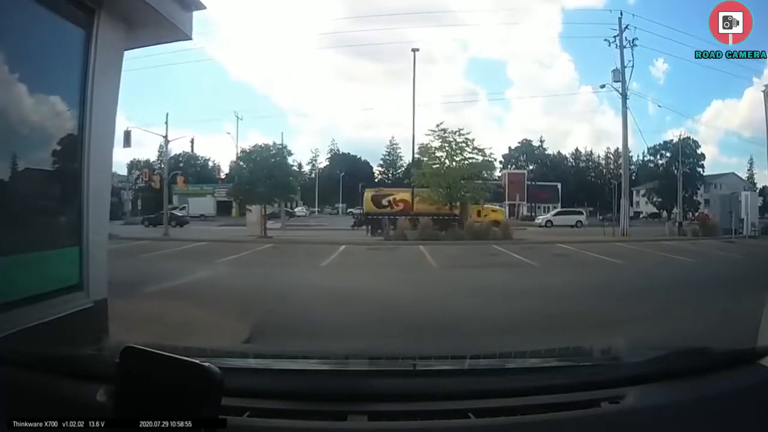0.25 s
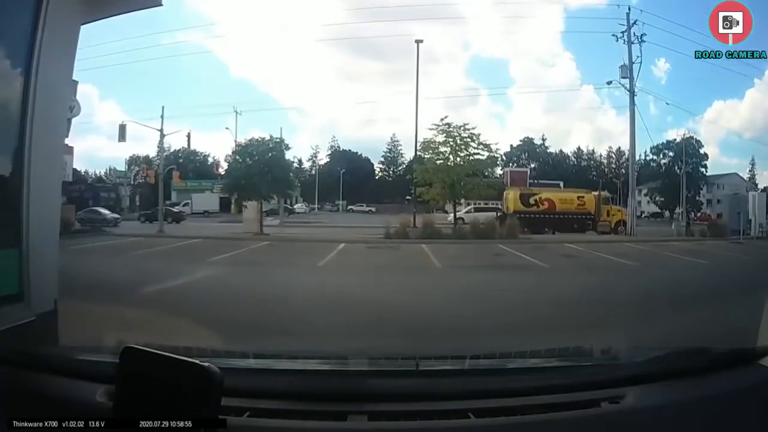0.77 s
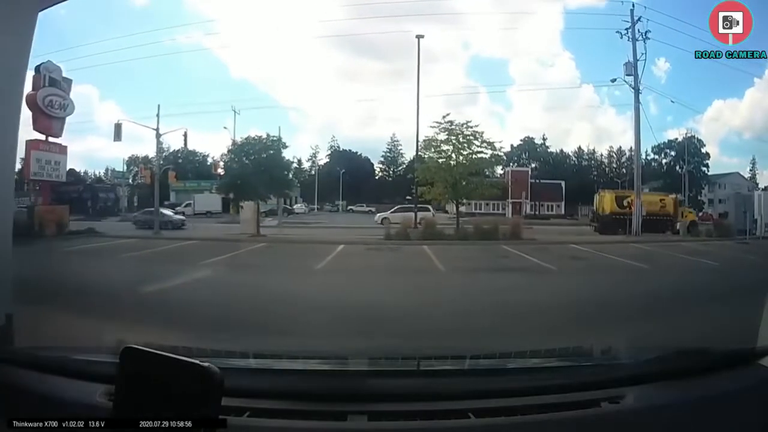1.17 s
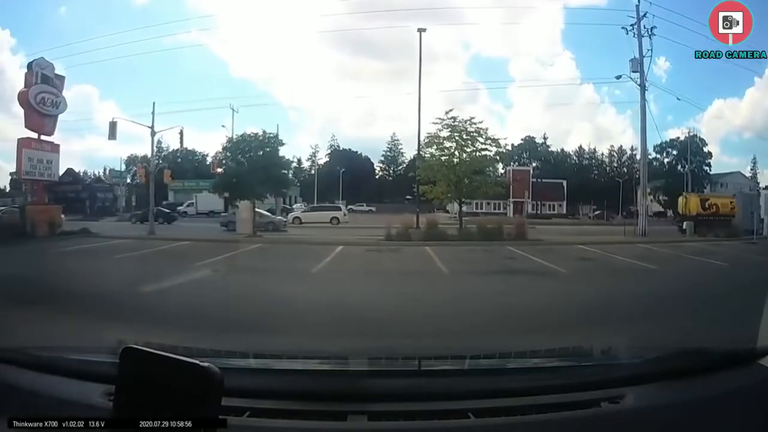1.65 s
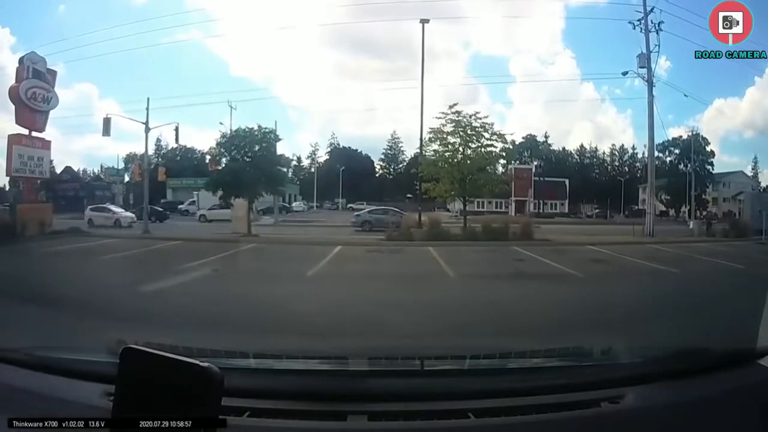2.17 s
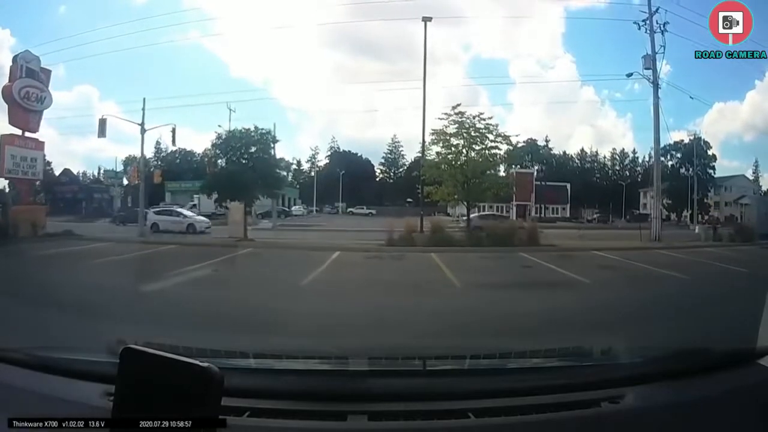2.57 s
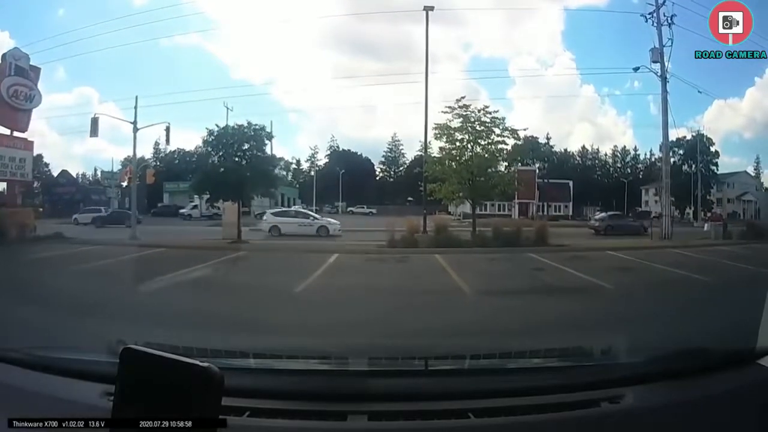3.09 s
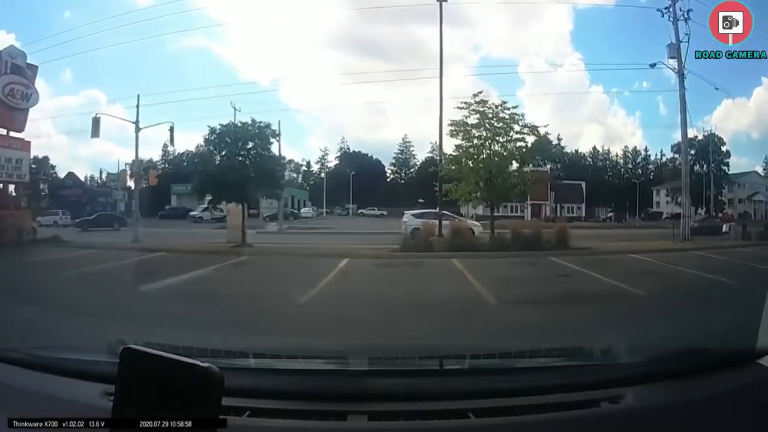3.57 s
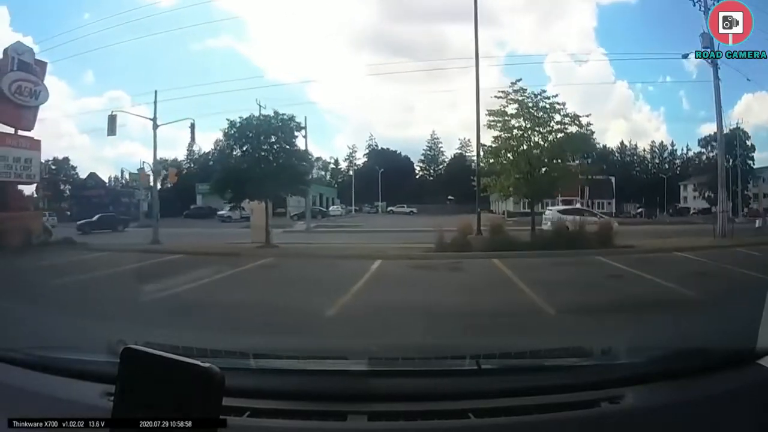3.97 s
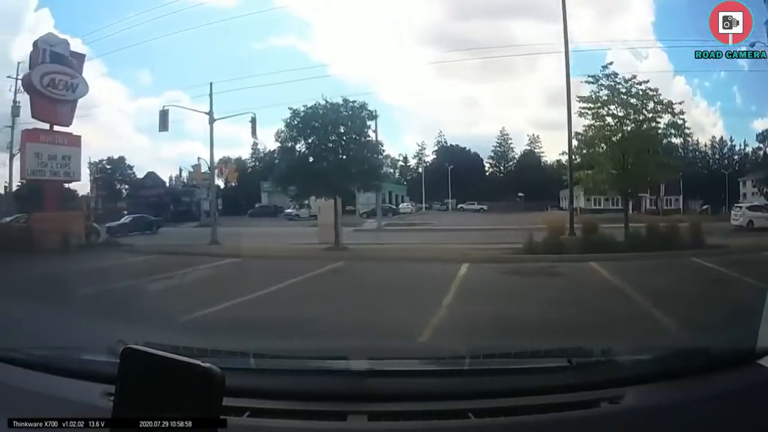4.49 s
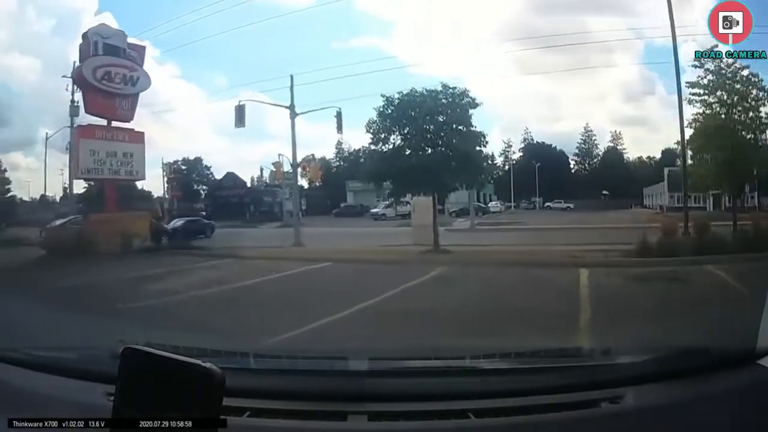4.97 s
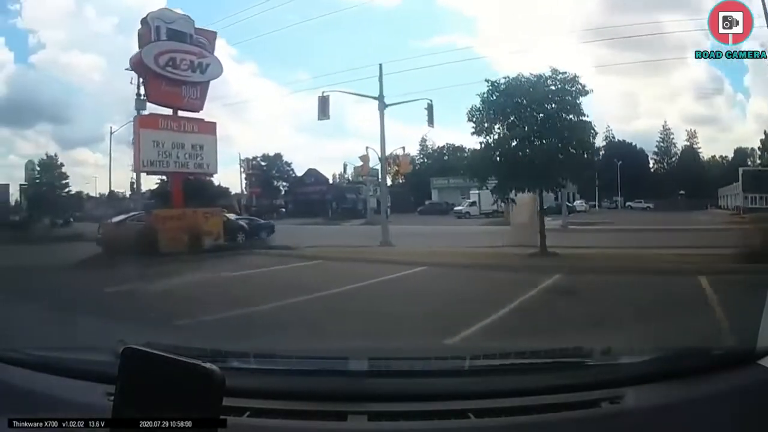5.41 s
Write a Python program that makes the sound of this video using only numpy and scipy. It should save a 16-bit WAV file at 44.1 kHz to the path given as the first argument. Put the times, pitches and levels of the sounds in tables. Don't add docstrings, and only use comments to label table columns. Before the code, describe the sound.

The microphone is inside a slowly moving car in a car park. A low, slightly stumbling engine hum and rumble run throughout, with very faint fan air and soft traffic wash outside. From about 0.3 to 1 s a truck's engine drones in pulls, sinking in pitch and fading away by 2 s. Dry plastic ticks come in a cluster at 0.4-0.7 s, then singly around 1.4-2.8 s and near 3.7 s. From 2.9 s a very faint high steering whine wavers; a car washes past near 3.8 s and the engine note rises. Around 4.05 s tyres begin to chirp outside, swelling into a rough, loud squeal with hiss, strongest at 4.7-5 s, then easing and dropping in pitch. At 5.42 s comes a heavy crash: thumps, snapping plastic, crunching metal, clanging bits and a deep cabin boom. A brief tyre scrape at 5.5-5.65 s and echo end it.

```python
import sys
import numpy as np
from scipy import signal
from scipy.fft import rfft, irfft, next_fast_len
from scipy.io import wavfile
from scipy.ndimage import uniform_filter1d, map_coordinates

SR = 44100
rng = np.random.default_rng(int(sys.argv[2]) if len(sys.argv) > 2 else 0)


def volts_from_db(level):
    exponent = np.asarray(level, float) / 20
    return 10 ** exponent


def bounce(signal):
    frames = np.transpose(np.atleast_2d(signal))
    limited = np.clip(frames, -1, 1)
    pcm = np.round(limited * 32767).astype(np.int16)
    wavfile.write(sys.argv[1], SR, pcm)


N = 248811

# t/s, slip f/Hz, level/dB, overtone level/dB
FRONT_TYRE = [(4.05, 1131, -49.5, -15), (4.26, 1125, -55, -17), (4.36, 1107, -39.5, -24.5),
              (4.5, 1062, -37, -16), (4.58, 1005, -47, -6), (4.68, 950, -36, -4), (4.8, 960, -32, 0),
              (4.93, 935, -35, 3), (5.04, 911, -32, 7.5), (5.12, 878, -30, 0), (5.19, 852, -36, 3.5),
              (5.27, 808, -35.5, 3), (5.3, 780, -48, -20)]
# t/s, slip f/Hz, level/dB
REAR_TYRE = [
    (4.17, 1233, -54),
    (4.32, 1169, -46),
    (4.6, 1119, -43),
    (4.82, 1004, -33.5),
    (4.961, 996, -29),
    (5.08, 955.5, -36.5),
    (5.2, 924, -37.5),
    (5.42, 853.5, -40.5),
]
# t/s, slip f/Hz, level/dB
INNER_TYRE = [
    (4.55, 886, -66.5),
    (4.63, 794, -45),
    (4.9, 766, -45),
    (5.04, 770, -49.5),
    (5.12, 652.4, -54.5),
    (5.29, 570, -53.5),
    (5.33, 541.5, -44.5),
    (5.37, 525, -54),
]
# t/s, slip f/Hz, level/dB
REBOUND_TYRE = [
    (5.49, 1058, -37),
    (5.54, 1026, -40),
    (5.565, 961, -42),
    (5.6, 948, -38),
    (5.68, 920, -45),
]
# t/s, f/Hz, level/dB, length/s
GRABS = [(4.055, 1140, -46.5, 0.048), (4.1, 1125, -48, 0.032), (4.14, 1120, -49, 0.024),
         (4.21, 1058, -41.5, 0.015), (4.225, 1209, -46, 0.039), (4.26, 1015, -44.5, 0.033),
         (4.285, 1143, -38, .026), (4.465, 1074, -40.5, 0.037), (4.53, 1005, -42, .03),
         (4.592, 985, -29.5, .018), (4.613, 977.4, -30, .03), (4.655, 960, -31.5, 0.034),
         (4.675, 1004, -33, .03), (4.55, 1150, -43, .04), (4.68, 1150, -38, .04), (4.69, 930, -31.5, 0.032),
         (4.74, 962, -26, 0.023), (4.76, 986, -23.5, 0.023), (4.765, 760, -33.5, 0.037),
         (4.795, 1000, -27, 0.021), (4.82, 953.6, -24, .028), (4.848, 1020, -23, 0.029),
         (4.865, 970, -28, .02), (4.885, 955, -28, 0.022), (4.91, 937, -26, .03), (4.935, 1009, -23, 0.019),
         (4.955, 1004, -25.5, 0.015), (4.985, 902, -27.5, 0.03), (5.005, 930, -29.5, 0.019),
         (5.04, 925, -35, 0.016), (5.075, 891, -30.5, 0.047), (5.14, 869.6, -33, 0.032),
         (5.295, 782, -38, 0.031), (5.556, 975, -28.5, .02), (5.574, 958, -31, .016),
         (5.59, 945, -34, 0.016), (5.604, 934, -36, .012)]
# t/s, level/dB
SLIDE_HISS = [
    (4.25, -83.5),
    (4.52, -68),
    (4.62, -57),
    (4.7, -45.5),
    (4.83, -41.5),
    (5.08, -49),
    (5.25, -60.5),
    (5.41, -66),
              (5.501, -47),
    (5.545, -65.5),
    (5.57, -50),
    (5.68, -66),
]
# f/Hz, level/dB per Hz
HISS_COLOUR = [(400, -22.5), (670, -14), (750, 8.5), (1150, 9), (1380, -2.5), (1750, -5.5), (2250, 5),
               (2570, -11.5), (2850, -5.5), (4300, -15), (5600, -26), (7900, -30.5), (10000, -44),
               (12500, -61.5)]
# f/Hz, level/dB
GLASS = [(300, -22.5), (550, 0), (670, -20.5), (740, -1), (1000, 1), (1400, 2), (1620, -10.5), (2000, -6),
         (2300, -8.5), (2570, -7), (2800, -11.5), (4000, -9), (8000, -14)]
FULL_DB = -25
OVERTONE_DB, OVERTONE_GROWS = -1, 0.44
JUDDER, JUDDER_PER_DB, CALM = 1.1, 0.01, .55
BRIGHT_DB, BRIGHT_GROWS, HARDEST_DB = 3, .2, -42

# t/s, thump level/dB, crunch level/dB, crunch fade by 60 dB/s
BLOWS = [
    (5.422, -25.5, -26, 0.14),
    (5.431, -21, -20.5, 0.062),
    (5.442, -23, -25.5, 0.065),
    (5.45, -16.5, -19.5, 0.073),
    (5.458, -17, -15, 0.046),
    (5.466, -22.5, -22, 0.089),
    (5.48, -43.5, -27, 0.17),
    (5.495, -31, -33, 0.14),
    (5.55, -39, -39, 0.45),
    (5.59, -38, -38, 0.29),
]
# f/Hz, level/dB, fade by 60 dB/s
SHELL = [(124, -1, 0.08), (189.3, -1, 0.15), (223, -4.5, 0.1), (294, -9, 0.11), (350, -20, 0.05),
         (601, -8, 0.09), (745, -6.5, 0.067)]
# f/Hz, level/dB per Hz
SNAP = [(210, -40), (300, 3.5), (600, -28), (900, -7), (1400, -2.5), (2000, -15), (2500, -15), (3500, -12),
        (4500, -20), (6000, -18.5), (6800, -18), (9000, -26), (13000, -38), (15300, -46.5)]
# f/Hz, level/dB per Hz
CRUNCH = [(210, -55), (300, 0), (450, -8.5), (750, -11), (1000, -6.5), (1400, -5.5), (1800, -17),
          (2400, -12.5), (2900, -22), (3600, -24), (6000, -34.5), (9000, -37), (14500, -67), (15950, -120)]
# t/s, f/Hz, level/dB, fade by 60 dB/s
CABIN_BOOMS = [
    (5.411, 18.5, -21, 1),
    (5.427, 49.4, -22, 1.2),
    (5.463, 18.5, -18, .25),
    (5.4675, 49.4, -18, .1),
    (5.599, 49.4, -30, 1),
    (5.617, 36, -30, .4),
]
# t/s, f/Hz, level/dB, length/s
DEBRIS = [(5.429, 1250, -33, 0.0052), (5.436, 1382, -28.5, 0.0052), (5.437, 6760, -39.5, 0.0075),
          (5.436, 3250, -37.5, .006), (5.444, 1090, -29, .006), (5.452, 1150, -29, .007),
          (5.453, 720, -25.5, 0.0033), (5.457, 2357, -32, 0.0095), (5.458, 3300, -37, .006),
          (5.46, 720, -23, 0.0071), (5.461, 1284, -30.5, 0.0057), (5.468, 1414, -26.5, 0.0083),
          (5.468, 740, -21.5, 0.013), (5.485, 1010, -28, 0.0042), (5.487, 2300, -38.5, .007),
          (5.499, 990, -32, 0.0051), (5.501, 2150, -40, .007), (5.504, 1100, -27, 0.0045),
          (5.513, 1096, -32, .007), (5.515, 2300, -43, .006)]
# f/Hz, fade by 60 dB/s
LOT_ECHO = [(200, 0.68), (1000, 1), (4000, 0.85), (12000, 0.5)]

# t/s, peak level/dB, ring level/dB, top level/dB
TICKS = [(0.4286, -54.5, -3, -6.5), (0.4467, -54.5, -6, -3), (0.5761, -60, -2, -3), (.584, -57, -3, -5),
         (0.5901, -53, -5, -6), (.618, -61, -9, 0), (0.6582, -49, -7, -4), (.684, -56, -5, -2),
         (0.692, -57, -6, -1), (1.472, -62, -6, -2), (1.4375, -58, -8, 0), (1.879, -51.5, -4, -3),
         (1.9321, -49.5, -4, -2.5), (2.0386, -46, -1, -2), (2.4717, -56, 1, -8), (2.591, -44.5, -1.5, -3),
         (2.8085, -58, -2, -1), (2.835, -44, -1.5, -2), (3.67, -53.5, 4, -9), (3.714, -59, 2.5, -12.5),
         (4.1894, -63, 1, 1), (5.039, -44.5, -3, -6), (5.3467, -50, -10, -10), (5.4175, -52, -8, -6)]
# f/Hz, level/dB per Hz
CLICK = [(3800, -30), (5200, -5), (7000, 4), (9000, -3), (10500, -13), (15000, -26.5)]
# f/Hz, level/dB per Hz
TRIM_COLOUR = [(1800, -44), (2600, -7), (3300, -16.5), (4200, -6.5), (5500, -13.5), (7000, -11),
               (8500, -7.5), (10500, -14.5), (13000, -20.5), (15000, -29.5)]
# t/s, f/Hz, level/dB, length/s
RUSTLES = [
    (1.16, 4000, -76, .03),
    (2.457, 1200, -59, 0.0073),
]

# t/s, firing f/Hz, tone level/dB
ENGINE = [(0, 23.75, -31.5), (.39, 23.68, -30), (.76, 24.74, -38), (1.17, 25.23, -30), (1.4, 25.98, -36.5),
          (2.3, 25.93, -29), (2.5, 25.96, -30), (2.72, 32.76, -37.5), (3.0, 35.16, -39.5),
          (3.15, 25.8, -39), (3.55, 26.18, -44.5), (3.8, 25.33, -29.5), (3.92, 28.8, -37.5),
          (4.19, 37.07, -34.5), (4.7, 38.1, -37.5), (4.95, 41, -37.5), (5.18, 42.2, -38), (5.38, 51.4, -42)]
# t/s, lost share level/dB, length/s
FALTERS = [
    (.23, 0, 0.05),
    (.52, -6.5, 0.051),
    (1.47, -0.5, 0.067),
    (2.37, -4, 0.044),
    (2.65, 1.5, 0.03),
]
# t/s, f/Hz, level/dB, length/s
DRONES = [
    (3.13, 89.55, -47.5, 0.13),
    (3.8, 94.8, -47, 0.29),
    (4.95, 97.9, -45.5, 0.14),
    (5.12, 101.8, -45, 0.11),
    (5.27, 205.5, -52, 0.14),
    (5.33, 109.3, -46, 0.13),
]
# f/Hz, level/dB per Hz
BOOM_COLOUR = [(7.1, -14.5), (12, -3), (35, -6.5), (46, -10.5), (60, -27), (70, -36.5), (91, -50),
               (150, -120)]
# f/Hz, level/dB per Hz
BODY_COLOUR = [(32, -27), (55, 8), (59, 1.5), (92, -4), (118, -11), (138, -9), (156, -16), (215, -14),
               (330, -27), (430, -55.5), (730, -120)]
# t/s, level over the rumble/dB, length/s
JOLTS = [
    (.04, 5, 0.21),
    (.45, 0, 0.13),
    (2.05, -7, 0.037),
    (2.75, -6.5, 0.38),
    (3.5, -9.5, 0.71),
    (4.3, -10, 0.21),
    (5.0, -15.5, 0.099),
]
BOOM_DB, BODY_DB, BODY_DB_PER_S = -37, -51.5, 1.38
# f/Hz, level/dB per Hz
FAN_COLOUR = [(2310, -64), (3300, -2), (3800, 0), (4300, -8.5), (5500, -9), (7300, -9.5), (7900, -3.5),
              (8600, 0), (9200, -9), (10500, -7.5), (11500, -14), (12700, -12), (13100, -25.5),
              (15500, -44)]
FAN_DB = -77
# f/Hz, level/dB
CIRCUIT = [(7898, -87.5)]
# t/s, f/Hz
STEERING = [(2.85, 8900), (3.0, 9900), (3.15, 10650), (3.3, 10850), (3.45, 10450), (3.6, 9450),
            (3.75, 8300), (3.87, 7600), (4.0, 8700), (4.14, 9450), (4.28, 8650), (4.4, 9200), (4.52, 9750),
            (4.7, 9560)]
STEERING_DB, STEERING_DB_PER_S = -87, -.5

# f/Hz, level/dB per Hz
ROAD_COLOUR = [(150, -17.5), (250, -4.5), (276, -3), (300, -6.5), (365, -6), (398, -12), (556, -4),
               (606, -4), (668, -13.5), (736, -5), (884, -8), (1200, -4), (1640, -20), (2050, -20.5),
               (3300, -32.5), (4290, -57.5), (7260, -120)]
# t/s, level against the tyre wash/dB, length/s
PASS = [
    (3.8, -11, 0.33),
]
LOW_DB, LOW_DB_PER_S, TYRE_DB = -54, -2, -54
LULL_S, LULL_DB, LULL_LASTS_S = 2.06, -2.5, 0.6
# multiple of firing rate, level/dB, waver/dB, share of each pull/dB
TRUCK_ORDERS = [
    (2, -62.5, 6, -16),
    (4, -65, 3, -25),
]
# t/s, level/dB, length/s
PULLS = [
    (.47, -48, 0.069),
    (.68, -45.5, 0.17),
    (.88, -48, 0.24),
    (1.83, -69, 0.13),
]
TRUCK_FROM_S, TRUCK_TO_S = 0.076, 1.9
TRUCK_HZ, TRUCK_HZ_PER_S = 132, -5.5


def skid():
    hiss_db, on = curves(SLIDE_HISS)
    judder = np.maximum(JUDDER + JUDDER_PER_DB * (hiss_db - HARDEST_DB), CALM)
    tyres = squeal(FRONT_TYRE, judder, wander=0.01004, spread=.035, count=3)
    tyres += squeal(REAR_TYRE, np.maximum(judder, .7), wander=.018, spread=.07, count=3)
    tyres += squeal(INNER_TYRE, 1.3, wander=.055, spread=0.069, count=3)
    tyres += squeal(REBOUND_TYRE, CALM, wander=0.01996, spread=0.085, count=3)
    tyres += short_tones(GRABS, sag=.45, overtone_db=-2.0, grows=0.64)

    hiss = volts_from_db(12.0 + 0.94 * wobble(60)) * rush(HISS_COLOUR, patchy_db=2.5)
    top = coloured(hiss, [(4500, -39.5), (6500, -7.5)])
    top_gain = volts_from_db(BRIGHT_DB + BRIGHT_GROWS * (hiss_db - HARDEST_DB))
    scrub = on * volts_from_db(hiss_db) * (hiss - top + top_gain * top)
    return coloured(tyres, GLASS) + scrub


def squeal(rows, judder, wander, spread, count):
    n = 2 * SR
    hz, db, *own, on = [c[-n:] for c in curves(rows)]
    judder = (judder * np.ones(N))[-n:]
    overtone_db = own[0] if own else OVERTONE_DB + OVERTONE_GROWS * (db - FULL_DB)
    total = np.zeros(n)
    for block in np.linspace(-1, 1, count):
        drift = wobble(25, size=n) + 1.6 * wobble(220, size=n)
        phase = turning(hz * (1 + spread * block + judder * wander * drift))
        shake_db = 2.68 * judder * wobble(54.9, size=n)
        outer_db = abs(block) * (5.7 * wobble(16, size=n) - 16.5 + 7.8 * judder)
        overtones = np.sin(2 * phase) + 0.16 * np.sin(3 * phase) + 0.068 * np.sin(4 * phase)
        overtones *= volts_from_db(overtone_db + 3.6 * wobble(50, size=n))
        total += volts_from_db(shake_db + outer_db) * (np.sin(phase) + overtones)
    return np.pad(on * volts_from_db(db) * total, (N - n, 0))


def crash():
    out, t = np.zeros(N + SR), np.arange(SR // 4) / SR
    for k, (s, thump_db, crunch_db, t60) in enumerate(BLOWS):
        shell = np.zeros(len(t))
        for hz, db, ring in SHELL:
            shell += volts_from_db(db + rng.normal(0, 3) - 60 * t / ring) * np.sin(2 * np.pi * hz * t)
        colour = SNAP if k == 1 else CRUNCH
        crunch = unit(coloured(rng.standard_normal(len(t)), colour))
        crunch *= volts_from_db(crunch_db - 2 + 2.1 * wobble(250, size=len(t)) - 60 * t / t60)
        onset = 1 - np.exp(-t / 0.0032)
        out[round(s * SR):][:len(t)] += (volts_from_db(thump_db) * shell + crunch) * onset
    for s, hz, db, t60 in CABIN_BOOMS:
        boom = volts_from_db(db - 60 * t / t60) * np.sin(2 * np.pi * hz * t)
        out[round(s * SR):][:len(t)] += boom * (1 - np.exp(-t / .006))
    return out[:N] + short_tones(DEBRIS, sag=0, overtone_db=-34, grows=0)


def trim():
    out, t = np.zeros(N + SR), np.arange(SR // 10) / SR
    for s, db, ring_db, top_db in TICKS:
        snap, rattle, ring = rng.standard_normal((3, len(t)))
        click = 1.17 * unit(coloured(snap, CLICK)) * volts_from_db(-60 * t / 0.0047)
        plastic = unit(coloured(rattle, TRIM_COLOUR))
        bright = 0.45 * unit(coloured(plastic, [(7000, 0), (10000, top_db)]))
        bright *= volts_from_db(3.4 * wobble(500, size=len(t)) - 60 * t / 0.067)
        dull = unit(coloured(ring, [(2500, -37), (3000, -4.5), (3600, 9.5), (4300, -37.0)]))
        dull *= volts_from_db(ring_db - 1.0 - 60 * t / 0.063) * np.minimum(t / 0.0033, 1)
        out[round((s + .0007) * SR):][:len(t)] += volts_from_db(db - 7.5) * (click + bright + dull)
    for s, hz, db, length in RUSTLES:
        band = [(0.79 * hz, -30), (.9 * hz, 0), (1.18 * hz, 0), (1.6 * hz, -30)]
        rub = unit(coloured(rng.standard_normal(len(t)), band))
        bell = np.exp(-4 * ((t - .05) / length) ** 2)
        out[round((s - .05) * SR):][:len(t)] += volts_from_db(db) * bell * rub
    return out[:N]


def engine():
    hz, tone_db, _ = curves(ENGINE)
    t = np.arange(N) / SR
    steady = 1 - swells(FALTERS)
    firing = np.sqrt(2) * volts_from_db(tone_db + 3.1 * wobble(7.06)) * steady * np.sin(turning(hz))
    hum = short_tones(DRONES, sag=-.3, overtone_db=-42.0, grows=0)
    boom = volts_from_db(BOOM_DB + 1.1 * wobble(4.4)) * steady * rush(BOOM_COLOUR, patchy_db=3)
    body = volts_from_db(BODY_DB + BODY_DB_PER_S * t) * (1 + swells(JOLTS)) * rush(BODY_COLOUR, patchy_db=2.0)
    return firing + hum + boom + body


def steering():
    t = np.arange(N) / SR
    motor_hz, on = curves(STEERING)
    pole = turning(uniform_filter1d(motor_hz, size=SR // 8)) / 4
    level_db = np.minimum(STEERING_DB + STEERING_DB_PER_S * (t - STEERING[0][0]), -86)
    load = np.clip((3.6 - t) / .12 + 1, .3, 1)
    lower = .9 * np.sin(3 * pole) + .7 * np.sin(2 * pole)
    return on * volts_from_db(level_db) * (np.sin(4 * pole) + load * lower)


def fan_and_circuit():
    fan = volts_from_db(FAN_DB + .6 * wobble(3)) * rush(FAN_COLOUR, patchy_db=.8)
    return fan + sum(volts_from_db(db) * np.sin(turning(np.full(N, hz))) for hz, db in CIRCUIT)


def truck():
    t = np.arange(N) / SR
    phase = turning((TRUCK_HZ + TRUCK_HZ_PER_S * t) * (1 + 0.0048 * wobble(14.3)))
    near = np.clip(np.minimum(t - TRUCK_FROM_S, TRUCK_TO_S - t) / 0.13, 0, 1)
    pull = swells(PULLS)
    drone = pull * np.sin(phase)
    for order, db, waver_db, pull_db in TRUCK_ORDERS:
        level = near * volts_from_db(db + waver_db * wobble(8.98)) + volts_from_db(pull_db) * pull
        drone += level * np.sin(order * phase)
    return np.sqrt(2) * drone


def road_wash():
    t = np.arange(N) / SR
    wash = rush(ROAD_COLOUR, patchy_db=1.44)
    low = coloured(wash, [(680, -9.0), (760, -38)])
    lull_db = LULL_DB * np.exp(-((t - LULL_S) / LULL_LASTS_S) ** 2)
    low_gain = volts_from_db(LOW_DB + LOW_DB_PER_S * t + 1.5 * wobble(3))
    tyre_gain = volts_from_db(TYRE_DB + lull_db) * (1 + swells(PASS))
    return volts_from_db(0.3 * wobble(5.3)) * (low_gain * low + tyre_gain * (wash - low))


def lot(x):
    hz, t, z = signal.stft(rng.standard_normal(SR // 2), SR, nperseg=256)
    fade = volts_from_db(-60 * t / along(LOT_ECHO, hz)[:, None])
    tail = signal.istft(z * fade, SR, nperseg=256)[1]
    late = np.pad(x, (1200, 0))
    return signal.fftconvolve(late, tail / np.linalg.norm(tail))[:N]


def short_tones(rows, sag, overtone_db, grows):
    out, t = np.zeros(N + SR), np.arange(-SR // 4, SR // 4) / SR
    for s, hz, db, length in rows:
        phase = turning(hz * (1 - sag * t))
        bell = np.sqrt(2) * volts_from_db(db) * np.exp(-4 * (t / length) ** 2)
        overtone = volts_from_db(overtone_db + grows * (db - FULL_DB)) * np.sin(2 * phase)
        out[round((s + t[0]) * SR):][:len(t)] += bell * (np.sin(phase) + overtone)
    return out[:N]


def swells(rows):
    t = np.arange(N) / SR
    return sum(volts_from_db(db) * np.exp(-4 * ((t - s) / length) ** 2) for s, db, length in rows)


def rush(spectrum, patchy_db):
    z = signal.stft(rng.standard_normal(N), nperseg=512)[2]
    field = uniform_filter1d(rng.standard_normal(z.shape), size=5, axis=0)
    field = uniform_filter1d(field, size=12, axis=1)
    patchy = signal.istft(z * volts_from_db(patchy_db * unit(field)), nperseg=512)[1][:N]
    return unit(coloured(patchy, spectrum))


def coloured(x, spectrum):
    m = next_fast_len(len(x) + 8192)
    gain = volts_from_db(along(spectrum, np.fft.rfftfreq(m, 1 / SR)))
    return irfft(rfft(x, m) * gain, m)[:len(x)]


def along(points, hz):
    f, v = np.transpose(points)
    return np.interp(np.log(hz + 1), np.log(f + 1), v)


def curves(rows, fade=0.044):
    s, *cols = np.transpose(rows)
    t = np.arange(N) / SR
    gate = np.clip(np.minimum(t - s[0], s[-1] - t) / fade + 1, 0, 1)
    return [np.interp(t, s, c) for c in cols] + [gate]


def wobble(rate, size=N):
    knots = rng.standard_normal(int(size * rate / SR) + 4)
    return map_coordinates(knots, [np.arange(size) * rate / SR])


def turning(hz):
    return 2 * np.pi * np.cumsum(hz) / SR


def unit(x):
    return x / np.sqrt(np.mean(x ** 2) + 1e-20)


def scene():
    tyres, impact = skid(), crash()
    echo = lot(volts_from_db(-13) * tyres + volts_from_db(-14.5) * impact)
    own_car = trim() + engine() + steering() + fan_and_circuit()
    return (tyres + impact + echo + own_car + truck() + road_wash())[None]


def band_limit(x):
    return signal.sosfilt(signal.butter(12, 15375, fs=SR, output="sos"), x)


def record(dry):
    mix = dry * np.minimum((N - np.arange(N)) / 250, 1)
    return band_limit(mix)


dry = scene()
out = record(dry)
bounce(out)
```